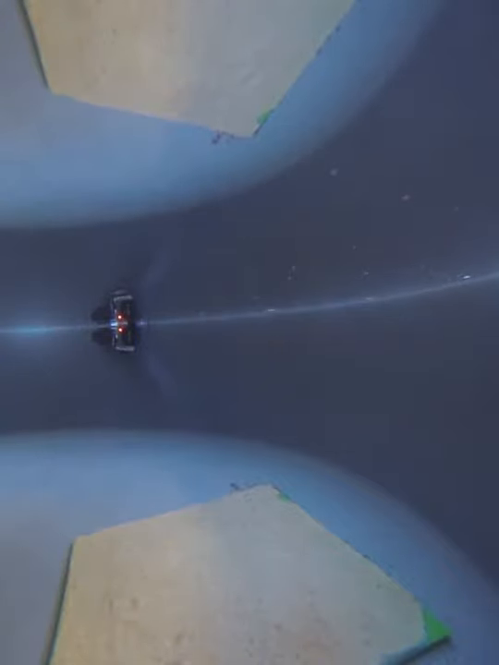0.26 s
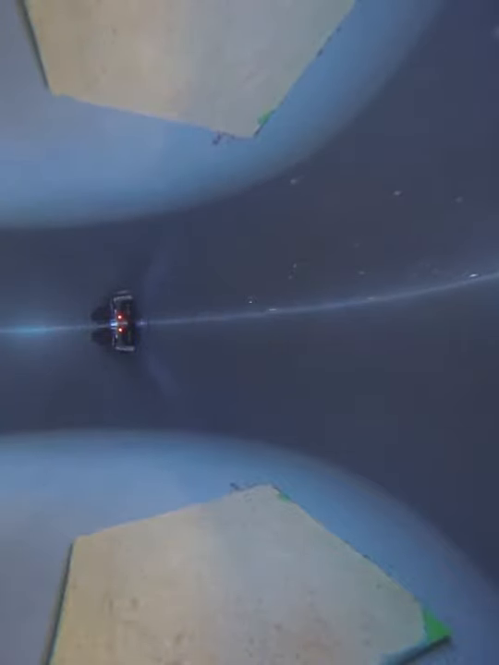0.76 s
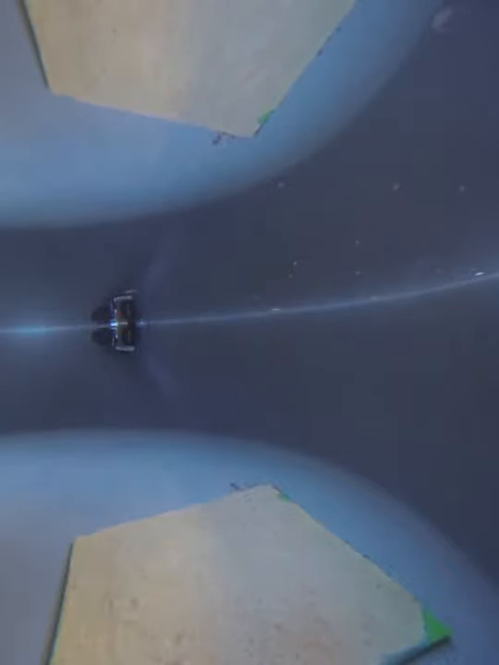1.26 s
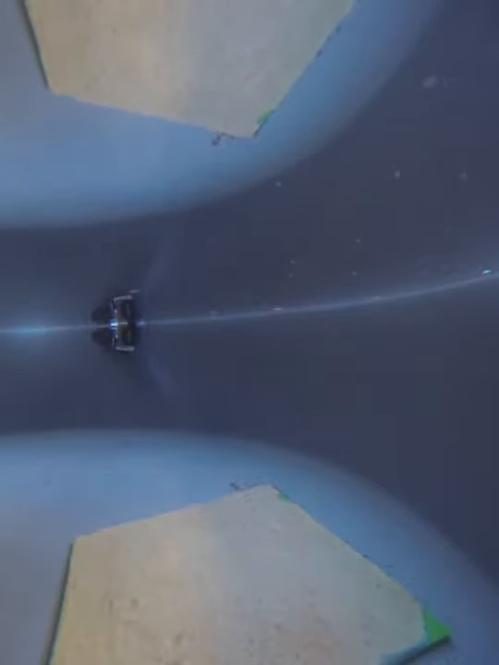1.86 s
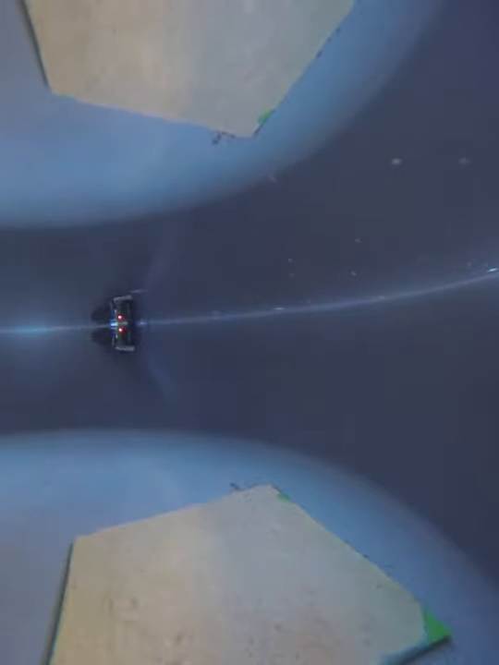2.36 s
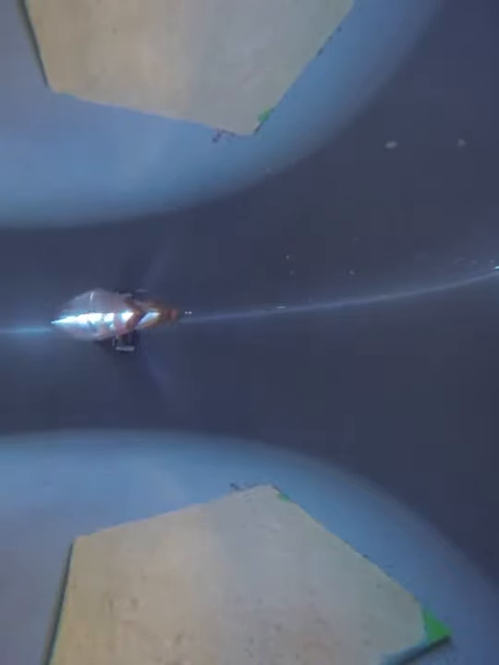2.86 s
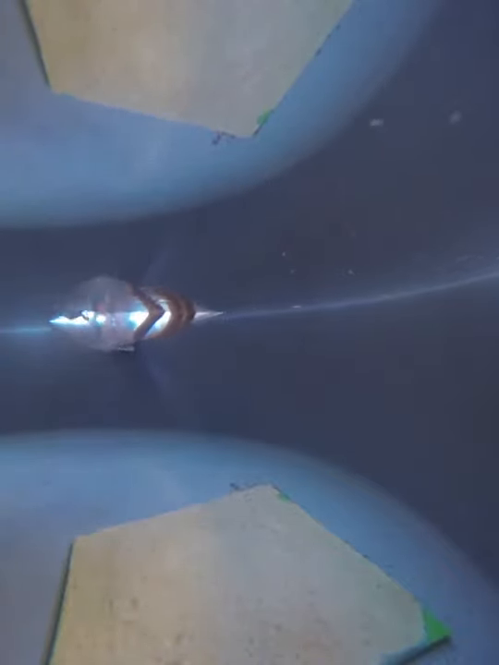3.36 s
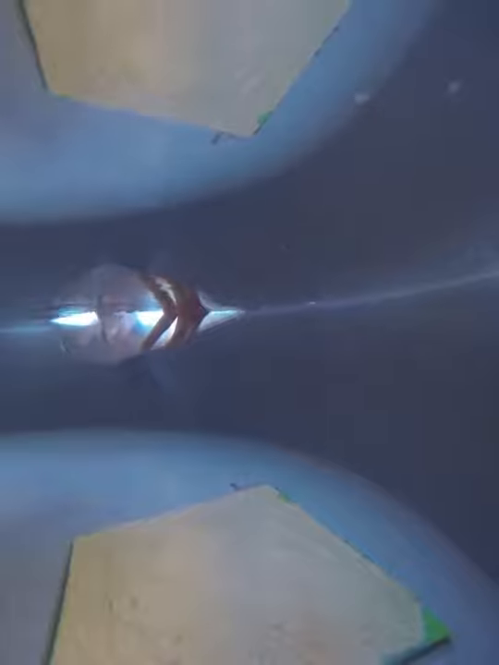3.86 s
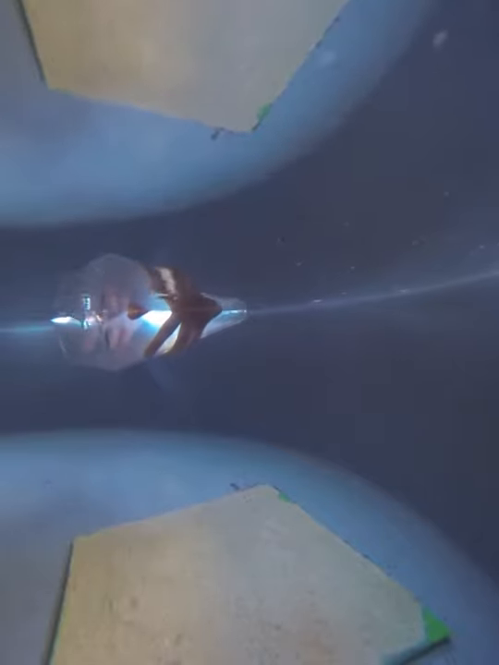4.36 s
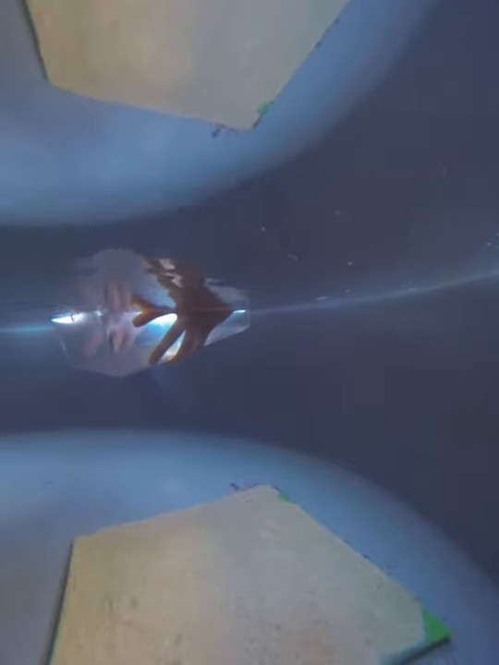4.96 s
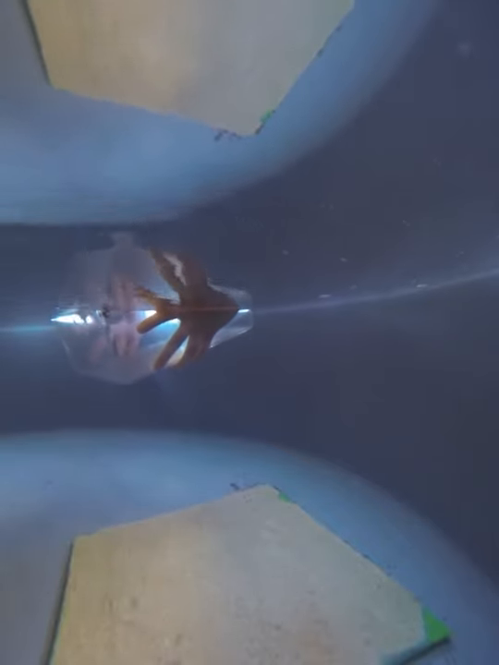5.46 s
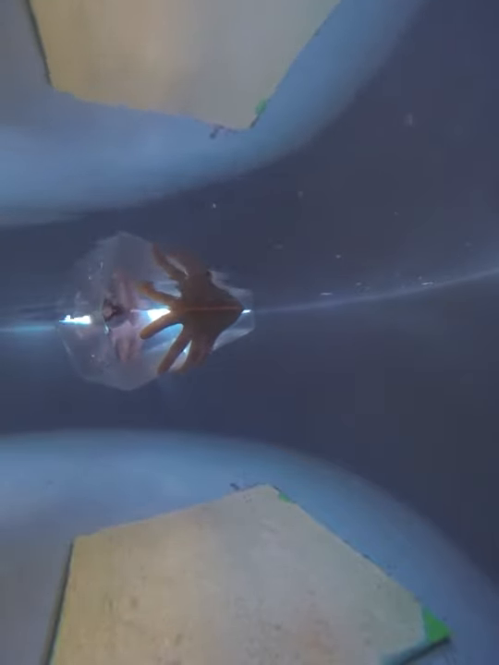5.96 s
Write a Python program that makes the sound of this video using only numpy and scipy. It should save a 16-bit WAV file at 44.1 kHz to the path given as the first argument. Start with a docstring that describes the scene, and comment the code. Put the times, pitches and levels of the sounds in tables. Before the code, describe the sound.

Low booming tank hum under churning, resonant water flow, scattered bubble gulps and bright pops, tiny housing ticks, and faint electronic whine throughout.

```python
"""Under water in a pump tank

Wall modes boom as wavering sines over a low rumble; turbulent noise rings the resonances of tank and housing.
Bubbles gulp and pop as decaying sines with noisy knocks, small ticks sit on the housing, a grainy wash rises late.
The electronics leak hiss and a faint pulsed whine.
"""
import sys
import numpy as np
from scipy import signal
from scipy.fft import rfft, irfft
from scipy.io import wavfile
from scipy.ndimage import uniform_filter1d

SR = 44100
rng = np.random.default_rng(int(sys.argv[2]) if len(sys.argv) > 2 else 0)


def to_wav(s):
    """Save 16-bit WAV."""
    ch = np.atleast_2d(s).T  # columns
    pcm = np.round(np.clip(ch, -1, 1) * 32767)  # PCM
    wavfile.write(sys.argv[1], SR, pcm.astype(np.int16))


N = 273420  # samples


def gain_of(db):
    """Amplitude gain of a level in dB."""
    return 10 ** (np.asarray(db) / 20)


def unit_rms(x):
    """Scales x to an RMS of 1."""
    return x / np.sqrt(np.mean(x ** 2) + 1e-20)


def read_db(points, hz):
    """Spectrum level at hz, interpolated over log frequency; -120 dB outside the points."""
    f, level_db = np.transpose(points)
    return np.interp(np.log(hz + 1), np.log(f + 1), level_db, left=-120, right=-120)


def columns(rows):
    """Per-sample curves of all columns after the time column."""
    s, *values = np.transpose(rows)
    t = np.arange(N) / SR
    return [np.interp(t, s, v) for v in values]


def shaped(x, gain):
    """Filters x by a gain given as a function of frequency."""
    spectrum = rfft(x)
    return irfft(spectrum * gain(np.fft.rfftfreq(len(x), 1 / SR)), len(x))


def coloured(x, points):
    """Filters x by a spectrum table and evens its level."""
    return unit_rms(shaped(x, lambda f: gain_of(read_db(points, f))))


def peak(hz, centre_hz, width_hz):
    """Resonance gain: 1 at the centre, 1/2 at the edges of its width."""
    return 1 / (1 + (2 * (hz - centre_hz) / width_hz) ** 2)


def wall(hz, db, waver_db, waver_hz, drift_hz):
    """A wall mode swings as a near sine that dips more than it swells and drifts a little in pitch."""
    noises = rng.standard_normal((2, N))
    waver, drift = (unit_rms(shaped(noise, lambda f: peak(f, 0, waver_hz))) for noise in noises)
    level_db = db + waver_db * np.minimum(waver, 1.1)
    turns = np.cumsum(hz + drift_hz * drift) / SR + rng.random()
    return np.sqrt(2) * gain_of(level_db) * np.sin(2 * np.pi * turns)


def walls():
    """Four wall modes swell and sink, with noise rumble between them."""
    # strong boom: t/s, f/Hz, level/dB
    boom = [(0.0, 50.4, -25), (0.045, 52.1, -35), (0.08, 52, -48), (0.17, 49.5, -30), (0.28, 48.5, -27),
            (0.36, 48.1, -36), (0.53, 49.7, -30.5), (0.76, 49.4, -28), (0.79, 50.8, -46), (0.93, 49.5, -27),
            (1.19, 48.8, -38), (1.4, 50.44, -40), (1.6, 48.75, -30.5), (1.83, 50.13, -40),
            (1.97, 50.2, -25.5), (2.12, 50.47, -32.5), (2.26, 50.35, -24), (2.64, 50.47, -26),
            (2.85, 50.5, -46), (2.99, 50, -24), (3.3, 50, -33.5), (3.32, 50.2, -50), (3.37, 51.35, -27),
            (3.64, 51.2, -36.5), (3.8, 50.4, -25.5), (3.9, 47.8, -25.5), (4.01, 47.94, -41),
            (4.18, 47.5, -32.5), (4.28, 49.1, -23.5), (4.38, 48.87, -32), (4.89, 49.14, -31),
            (4.99, 51, -51), (5.11, 50.5, -35), (5.13, 48.66, -62), (5.47, 49.15, -23.5), (5.7, 49.95, -43),
            (5.78, 53.57, -38.5), (6.06, 53.4, -46), (6.2, 51.04, -36.5)]
    # swells of the deepest, highest and middle mode: t/s, level/dB
    deep = [(0.0, -42), (0.07, -38), (0.26, -46), (0.38, -36), (0.53, -34), (0.69, -38), (1.02, -32),
            (1.17, -35), (1.33, -41), (1.59, -30.5), (1.73, -35), (1.81, -42), (1.91, -46), (2.04, -37),
            (2.23, -33), (2.35, -39.5), (3.12, -33), (3.5, -37), (3.73, -34), (3.9, -38), (3.97, -57),
            (4.11, -38), (4.28, -40), (4.56, -51), (4.68, -36), (5.13, -41), (5.28, -36), (5.75, -38),
            (5.89, -33.5), (6.2, -46)]
    upper = [(0.0, -46.5), (0.96, -45.5), (1.16, -36), (1.24, -51), (1.73, -42), (2.05, -59), (2.11, -39.5),
             (2.78, -47), (2.99, -58), (3.04, -49), (3.25, -58), (3.42, -42), (3.83, -68.5), (3.95, -36.5),
             (4.23, -59), (4.27, -45), (4.83, -40), (5.32, -57), (5.72, -43.5), (5.78, -76), (5.85, -49.5),
             (6.2, -54)]
    middle = [(0.0, -40), (1.67, -38), (1.81, -48), (1.88, -36), (2.12, -62), (2.3, -43), (2.8, -39),
              (2.85, -45), (5.27, -45.5), (5.37, -40), (6.15, -50.5), (6.2, -60)]
    # rumble spectrum: f/Hz, relative level/dB
    rumble = [(7.1, -28), (12, -1), (21, -17), (38, -7), (54, 8), (68, 2.5), (90, -4.5), (102, -10),
              (120, -4), (160, -26), (210, -59), (350, -120)]
    rumble_db = -42.5
    deep_hz, middle_hz, upper_hz = 30.8, 61.5, 82.76
    out = wall(*columns(boom), waver_db=0.4, waver_hz=12, drift_hz=0.28)
    out += wall(deep_hz, *columns(deep), waver_db=0.8, waver_hz=2.6, drift_hz=0.44)
    out += wall(upper_hz, *columns(upper), waver_db=4.0, waver_hz=13.8, drift_hz=2.62)
    out += wall(middle_hz, *columns(middle), waver_db=2.5, waver_hz=11.3, drift_hz=0.75)
    return out + gain_of(rumble_db) * coloured(rng.standard_normal(N), rumble)


def tank_response():
    """Causal ring of all resonances together: minimum phase follows from the log gain."""
    # resonances of tank and housing: f/Hz, width/Hz, level/dB
    tank = [(122, 26, -10), (136, 9.3, -14.5), (164.6, 8.1, -2), (181.7, 12, -6.5), (204.5, 10, -3),
            (237.6, 24, -11.5), (296.5, 35, -2), (439.8, 24.6, -8), (548.6, 16.4, -2), (568, 22, -3),
            (625.2, 33, -2), (738, 26, -15.5), (784.3, 22, -7), (820.5, 31, -4.5), (905.5, 65, -6.5),
            (1102, 66, -4.5), (1152, 47, -5.5), (1236, 43, -6), (1339, 130, -5), (1400, 25, -10.5),
            (1610, 100, -13.5), (1647, 50, -10), (1769, 67, -13.5), (2160, 190, -21.5), (2470, 47, -18.5),
            (2597, 210, -20.5), (2885, 200, -24.5), (3183, 296, -23), (3210, 180, -27), (3835, 140, -35),
            (3940, 180, -43.5), (4830, 83, -62), (4870, 120, -41)]
    # floor between the resonances: f/Hz, level/dB
    between = [(90, -23), (150, -8), (700, -13.5), (1500, -21.5), (1900, -29), (3500, -41.5), (5500, -45.5),
               (9000, -76)]
    hz = abs(np.fft.fftfreq(16384, 1 / SR))
    power = gain_of(read_db(between, hz)) ** 2
    power += sum((gain_of(db) * peak(hz, f, w)) ** 2 for f, w, db in tank)
    log_gain = np.log(power + 1e-10) / 2
    return np.fft.ifft(np.exp(np.conj(signal.hilbert(log_gain)))).real[:8192]


def turbulence(bursts_per_s, spread_db, burst_s, share):
    """Steady noise plus short random bursts where eddies and fine bubbles collapse."""
    sizes = gain_of(spread_db * np.minimum(rng.exponential(1, N), 2.2))
    starts = sizes * (rng.random(N) < bursts_per_s / SR)
    envelope = signal.lfilter([1], [1, -np.exp(-1 / (burst_s * SR))], starts)
    share = np.clip(share, 0, 1)  # power share of the bursts
    bursts = unit_rms(envelope * rng.standard_normal(N))
    return np.sqrt(1 - share) * rng.standard_normal(N) + np.sqrt(share) * bursts


def patchy(x, depth_db, frames, bins, size=256):
    """Random patches of time and frequency swell and sink, as clouds of bubbles drift by."""
    overlap = size * 3 // 4
    _, _, z = signal.stft(x, nperseg=size, noverlap=overlap)
    patches = uniform_filter1d(rng.standard_normal(z.shape), bins, 0)
    patches = uniform_filter1d(patches, frames, 1)
    z = z * gain_of(depth_db * unit_rms(patches))
    return signal.istft(z, nperseg=size, noverlap=overlap)[1][:N]


def flow():
    """Turbulence rings the tank in six bands, each with its own bursts plus some shared by all."""
    # flow strength: t/s, level/dB
    strength = [(0.0, 2), (0.5, -2.5), (0.9, -0.5), (2.43, 0.1), (2.75, -1.5), (3.3, -0.6), (4.6, -0.85),
                (4.85, -3.5), (5.4, -3.5), (6.2, -9)]
    # bands, low to high: level/dB, flow following/(dB/dB), shared burst gain, patch depth/dB
    bands = [(-45, 0.44, 0.12, 1.06), (-43, 1.01, 0.9, 2.3), (-44.5, 0.42, 0.85, 1.7),
             (-45, 0.24, 1.1, 1.84), (-59.5, 0.47, 0.85, 2.8), (-69, 0.1, 0.52, 2)]
    calming = 0.69  # extra change of the shared bursts, dB per dB of flow
    edges_hz = (0, 400, 690, 1000, 1900, 3400, SR)
    ring = tank_response()
    shared = turbulence(bursts_per_s=70, spread_db=5.0, burst_s=0.0061, share=0.5)
    # bursts/s, spread/dB, burst/s, share
    drives = (turbulence(30, 0.63, 0.036, 0.2), turbulence(80, 1.5, 0.014, 0.26),
              turbulence(80, 2.1, 0.025, 0.4), turbulence(60, 1.3, 0.011, 0.4),
              turbulence(90, 6.8, 0.0077, 0.3), turbulence(66, 2.9, 0.0017, 0.085))
    strength_db = columns(strength)[0]
    shared = gain_of(calming * strength_db) * shared
    out = np.zeros(N)
    for k, (db, follows, together, patch_db) in enumerate(bands):
        drive = patchy(drives[k] + together * shared, patch_db, frames=14, bins=4)
        rung = signal.oaconvolve(drive, ring)[:N]
        band = shaped(rung, lambda f: (f >= edges_hz[k]) & (f < edges_hz[k + 1]))
        out += gain_of(db + follows * strength_db) * unit_rms(band)
    # single resonances swell and sink slowly
    return patchy(out, depth_db=1.5, frames=24, bins=2, size=2048)


def wash():
    """Grainy hiss through a few wide resonances, and a finely crackling treble hiss above it."""
    # wash swell, rising late: t/s, level/dB
    wash_swell = [(0, -80), (3.0, -63), (3.6, -56.5), (4.1, -59), (4.7, -53.5), (5.0, -52), (5.36, -53.5),
                  (5.372, -45.5), (5.52, -55.5), (6.2, -63)]
    # wash resonances: f/Hz, width/Hz, relative level/dB
    modes = [(1390, 150, 17.5), (1670, 95, 9.5), (2200, 230, 6), (2700, 400, -12), (3170, 390, 3.5),
             (3970, 240, -4.5), (5700, 570, -17)]
    # treble hiss, staying to the end: t/s, level/dB
    treble_swell = [(0, -87), (4.3, -84), (4.8, -73), (5.4, -65.5), (6.2, -64.5)]
    # treble spectrum: f/Hz, relative level/dB
    treble_colour = [(2600, -25), (3200, 4), (4000, 2), (4500, -8.5), (5700, -7), (6600, -17), (8000, -42)]
    grain = turbulence(bursts_per_s=65, spread_db=5.0, burst_s=0.004, share=0.2)
    low = unit_rms(shaped(grain, lambda f: sum(gain_of(db) * peak(f, hz, w) for hz, w, db in modes)))
    crackle = turbulence(bursts_per_s=100, spread_db=3.7, burst_s=0.003, share=0.17)
    treble = coloured(crackle, treble_colour)
    return gain_of(columns(wash_swell)[0]) * low + gain_of(columns(treble_swell)[0]) * treble


def electronics():
    """Hiss, and a high tone with fizz above it, gated in regular pulses; its phase slips each time."""
    # hiss spectrum: f/Hz, relative level/dB
    hiss = [(3000, -21), (4800, -32), (6100, -6), (7000, -9.5), (8000, -7.5), (8600, -11.5), (9600, -9.5),
            (10700, -15.5), (11800, -11.5), (12650, -17), (13700, -8.5), (14500, -18), (15100, -29)]
    hiss_db = -73
    pulses_per_s, start_turns, on_share = 47.97, .52, .39
    turns = np.arange(N) / SR * pulses_per_s - start_turns
    pulse = np.floor(turns).astype(int) + 1
    t = turns % 1 / pulses_per_s  # s since pulse start
    slip, size = rng.standard_normal((pulse.max() + 1, 2)).T
    gate = uniform_filter1d(1. * (turns % 1 < on_share), size=24)
    # sign flips every pulse
    tone = np.sin(2 * np.pi * 12900 * t + np.pi * pulse + .8 * slip[pulse])
    fizz = unit_rms(shaped(rng.standard_normal(N), lambda f: peak(f, 13800, 900)))
    whine = gate * (gain_of(-70.5 + 1.2 * size[pulse]) * tone + gain_of(-89) * fizz)
    # faint tick each second pulse
    clicks = 1. * (np.diff(pulse // 2, prepend=0) > 0)
    clock = shaped(clicks, lambda f: peak(f, 5700, 900))
    whine += gain_of(-85.5) * unit_rms(clock)
    grain = turbulence(bursts_per_s=68, spread_db=-2.0, burst_s=0.0025, share=0.2)
    return whine + gain_of(hiss_db) * coloured(grain, hiss)


def bubbles(rows, cycles, rise_s, ring_db, splash_db):
    """Each bubble rings at its own pitch, and its collapse adds a noisy knock around that pitch."""
    size = 4096
    out, t = np.zeros(N + size), np.arange(size) / SR
    for (s, db, hz), noise in zip(rows, rng.standard_normal((len(rows), size))):
        shape = (1 - np.exp(-t / rise_s)) * np.exp(-t * hz / cycles)
        knock = unit_rms(shaped(noise, lambda f: peak(f, hz, 0.94 * hz) ** 2))
        ring = np.sin(2 * np.pi * hz * t)
        sound = shape / shape.max() * (gain_of(ring_db) * ring + gain_of(splash_db) * knock)
        out[round(s * SR):][:size] += gain_of(db) * sound
    return out[:N]


def gulps():
    """Larger bubbles are heard through the tank, so they ring the modes near their pitch."""
    # gulps: t/s, relative level/dB, f/Hz
    gulp_rows = [(0.028, -20, 660), (0.109, -30, 815), (0.213, -19, 625), (0.277, -6, 610),
                 (0.372, -18, 1310), (0.522, -7, 677), (0.656, -17, 1180), (0.768, -12, 535),
                 (0.94, -14, 1150), (0.985, -10.5, 565), (1.02, -17, 598), (1.078, -18, 604),
                 (1.113, -27, 614), (1.312, -17, 650), (1.357, -10.5, 830), (1.447, -11.5, 433),
                 (1.475, -12.5, 630), (1.893, -15.5, 572), (1.952, -10, 642), (2.065, -15.5, 820),
                 (2.201, -13, 850), (2.29, -14, 641), (2.33, -15, 556), (2.375, -14, 540),
                 (2.413, -16, 630), (2.458, -15, 1200), (2.507, -17, 950), (2.548, -14, 431),
                 (2.597, -9, 640), (2.61, -17, 780), (2.73, -18, 805), (2.787, -13, 638), (2.951, -8, 864),
                 (3.03, -8, 835), (3.409, -13, 1257), (3.481, -12, 640), (3.541, -10.5, 840),
                 (3.582, -16.5, 817), (3.681, -14, 619.6), (3.771, -11.5, 1326), (3.991, -11.5, 1306),
                 (3.952, -16, 1140), (4.085, -15, 742.5), (4.295, -12, 1330), (4.385, -17, 590),
                 (4.407, -24, 609), (4.432, -20, 610), (4.64, -15, 628), (4.73, -17.5, 549.4),
                 (4.807, -16.5, 607), (5.369, -33, 1360), (5.408, -15, 1297), (6.008, -14, 1335)]
    ring = tank_response()
    ring = ring / abs(rfft(ring)).max()
    dry_gulps = bubbles(gulp_rows, cycles=7.1, rise_s=0.0017, ring_db=-14.0, splash_db=-15)
    return gain_of(-1.5) * signal.oaconvolve(dry_gulps, ring)[:N]


def all_pops(count):
    """The clearest pops, and fainter ones of random time, size and pitch."""
    # clear pops: t/s, relative level/dB, f/Hz, spray relative level/dB, spray f/Hz
    clear = [(0.0423, -49, 2600, -51.5, 3750), (0.3012, -32, 3050, -62, 3790),
             (0.318, -28.5, 2910, -68, 3700), (0.328, -34, 2900, -66, 3680), (0.368, -37, 3230, -68, 3800),
             (0.405, -33, 3240, -67, 3640), (0.7418, -46, 2213, -54, 3560), (0.8791, -35, 2650, -73, 3800),
             (0.9074, -33, 2600, -66, 3780), (0.9398, -39, 2730, -60, 3900), (1.064, -54, 2580, -57, 3730),
             (1.1089, -29, 3140, -64, 3550), (1.2018, -29.5, 2660, -75, 3820),
             (1.2438, -48, 3290, -49, 3970), (1.3578, -37, 3280, -56, 3560), (1.3825, -32, 2490, -52, 3820),
             (1.5599, -43, 3200, -58, 3920), (1.6142, -51, 2590, -58, 3930), (1.888, -32, 2965, -75, 3770),
             (1.9774, -30, 2490, -59, 3767), (2.3386, -36, 3240, -66, 3990), (2.446, -31, 2124, -56, 4450),
             (2.517, -32, 3200, -55, 3720), (2.5726, -54, 2890, -55.5, 3940),
             (2.9412, -37, 3120, -55, 3554), (3.0272, -35.5, 3235, -70, 3800),
             (3.3244, -27, 2450, -59, 3800), (3.4077, -27.5, 2557, -62, 3796),
             (3.4487, -31, 2270, -69, 3800), (3.705, -37, 3165, -69, 3830),
             (3.8475, -31.5, 3160, -70, 3800), (3.91, -29, 2324, -67, 3800), (3.9559, -33, 3090, -52, 3840),
             (4.0382, -38, 3100, -60, 5660), (4.0716, -44, 3100, -58, 4080), (4.1525, -46, 3260, -53, 3900),
             (4.2275, -38, 2996, -81, 3760), (4.2372, -37, 3134, -51, 3920), (4.2395, -50, 3116, -56, 5200),
             (4.242, -36, 2305, -47, 4150), (4.2495, -43, 2320, -58, 4200), (4.2725, -42, 2930, -56, 4450),
             (4.277, -44, 2500, -55, 4540), (4.4263, -33, 3080, -64, 3540), (4.557, -50, 3110, -55, 3995),
             (4.751, -34, 3200, -68, 3757), (4.765, -34, 2310, -70, 3834), (4.852, -28.5, 2123, -73, 3164),
             (4.918, -35, 2210, -72, 3805), (4.936, -33, 2210, -74, 3784), (5.0025, -46, 3137, -54, 3960),
             (5.3005, -54, 2230, -52, 3950), (5.3677, -48, 3090, -56, 3920), (5.3809, -54, 2146, -52, 3900),
             (5.4792, -30, 3214, -63, 3800), (5.5667, -44, 3080, -53, 3900), (5.7818, -49, 3100, -55, 3976),
             (5.9284, -46, 3110, -55, 4080), (6.193, -35, 3127, -68, 3803)]
    pop_db, spray_db, spread_db = -35.5, -68, -1
    low_hz, high_hz = 2070, 3440
    spray_hz, spray_spread_hz = 3820, 120
    chance = rng.random((count, 2)).T
    size = rng.standard_normal((count, 3)).T
    faint = np.transpose([chance[0] * N / SR,
                          pop_db + spread_db * size[0],
                          low_hz + (high_hz - low_hz) * chance[1],
                          spray_db + spread_db * size[1],
                          spray_hz + spray_spread_hz * size[2]])
    return np.vstack([clear, faint])


def pops():
    """Small bubbles ring and decay fast, each with a brighter spray at a second pitch."""
    s, db, hz, spray_db, spray_hz = all_pops(count=22).T
    body = np.transpose([s, db, hz])
    spray = np.transpose([s, spray_db, spray_hz])
    out = bubbles(body, cycles=12.4, rise_s=0.00048, ring_db=-14.5, splash_db=-20.5)
    return out + bubbles(spray, cycles=14.7, rise_s=0.00064, ring_db=0.0, splash_db=-3.5)


def ticks():
    """Ticks on the housing: very short high rings with a noisy knock."""
    # ticks: t/s, relative level/dB, f/Hz
    tick_rows = [(0.2488, -68, 8100), (0.3222, -75, 8040), (1.915, -74, 11860), (2.1246, -74, 8680),
                 (2.3246, -73, 7080), (3.131, -66, 5290), (3.2191, -74, 8220), (3.3428, -72, 8000),
                 (3.35, -73, 8080), (3.3777, -61, 11520), (3.378, -66, 14000), (3.378, -67, 4300),
                 (3.3798, -71, 11600), (3.3802, -72, 6540), (4.2378, -74, 8010), (4.753, -68, 5540),
                 (5.015, -65, 5350), (5.26, -66, 5710), (5.449, -64, 5474), (5.7316, -64, 6400)]
    return bubbles(tick_rows, cycles=11, rise_s=.0004, ring_db=10.5, splash_db=2)


def scene():
    """Sum of all sources, one channel."""
    return (walls() + flow() + wash() + electronics() + gulps() + pops() + ticks())[None]


def record(dry):
    """A 4 ms fade-in, then a steep linear-phase low-pass."""
    edge_hz = 15050
    started = dry * np.minimum(np.arange(N) / (.004 * SR), 1)
    lowpass = signal.firwin(511, edge_hz, window=("kaiser", 9), fs=SR)
    return signal.oaconvolve(started, lowpass[None], "same")


dry = scene()
out = record(dry)
to_wav(out)
```